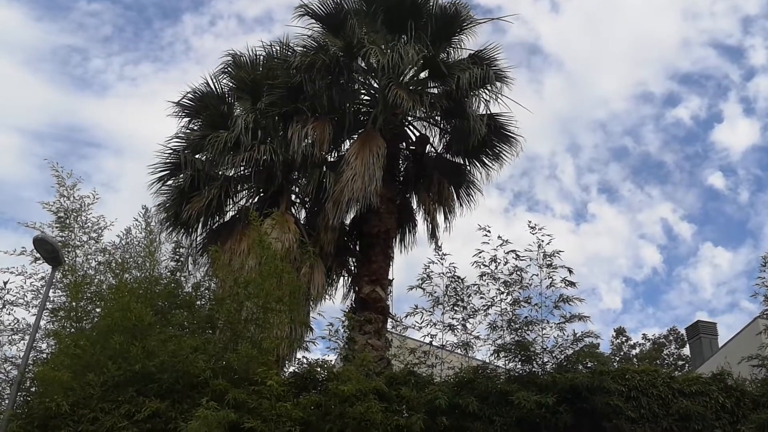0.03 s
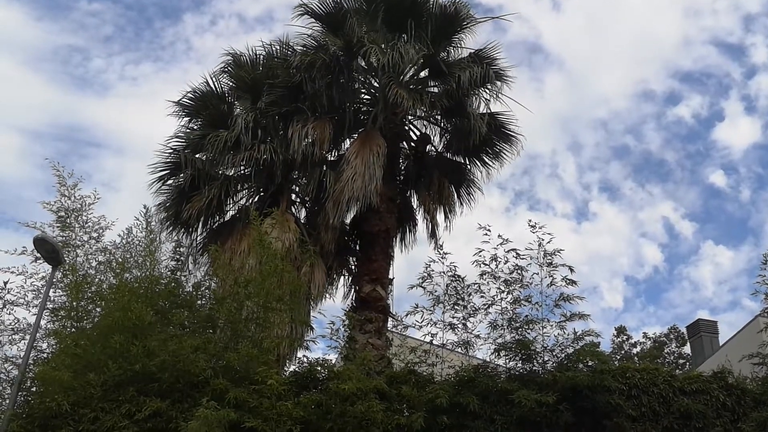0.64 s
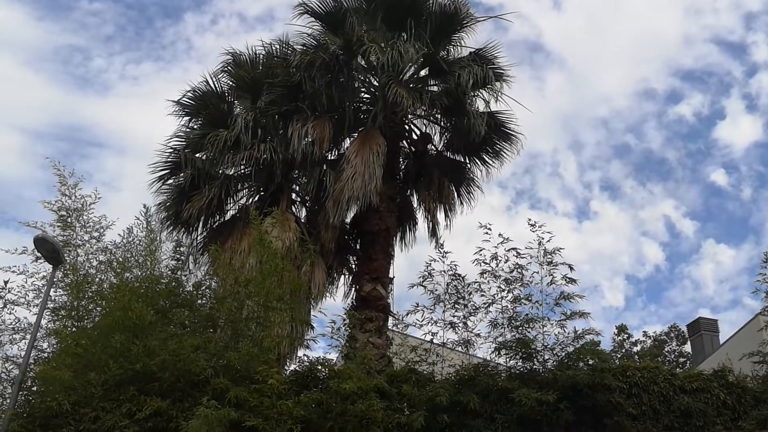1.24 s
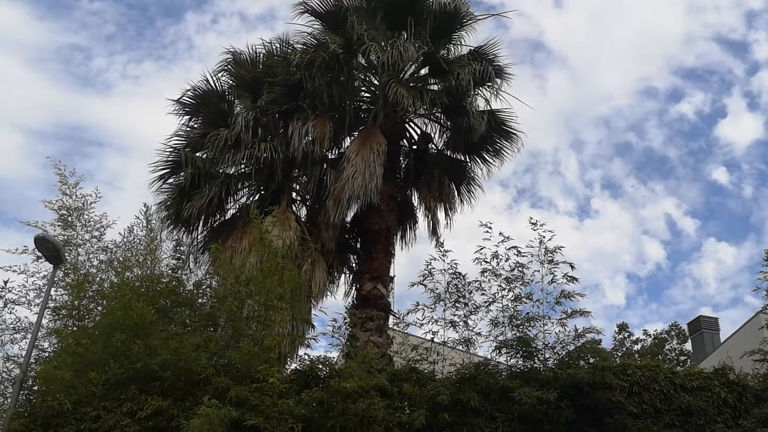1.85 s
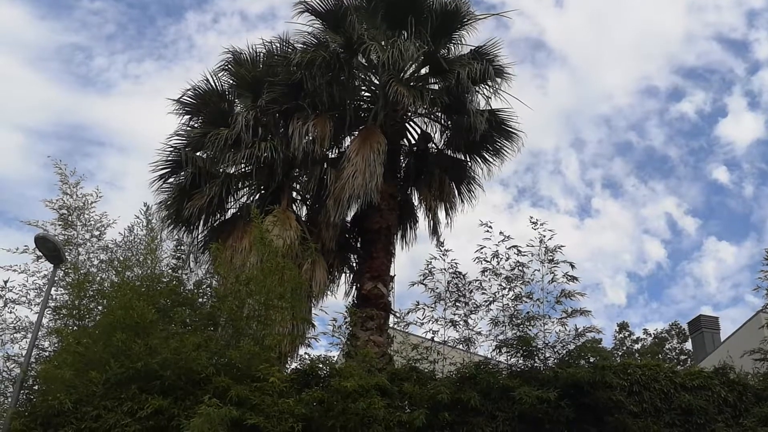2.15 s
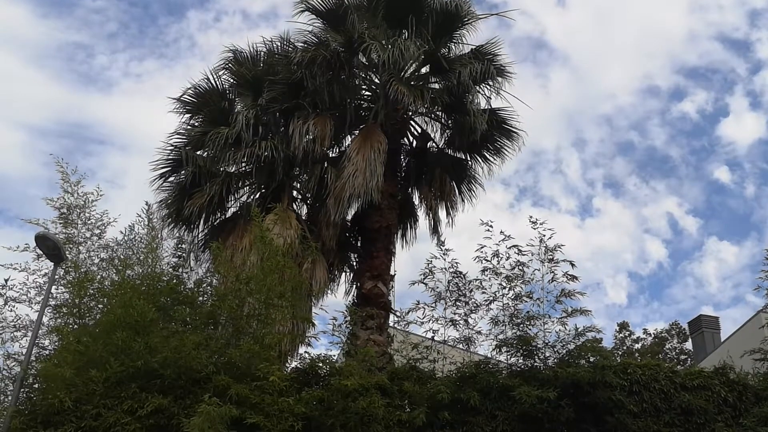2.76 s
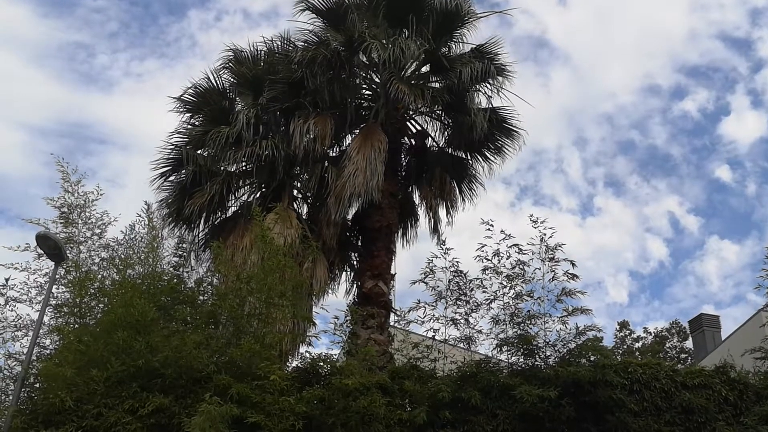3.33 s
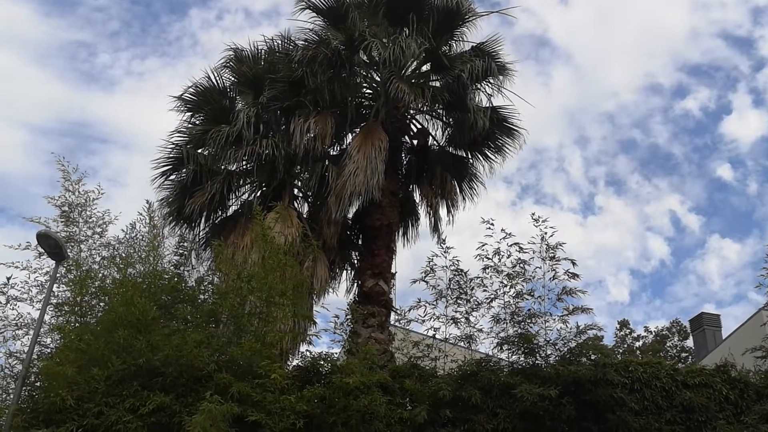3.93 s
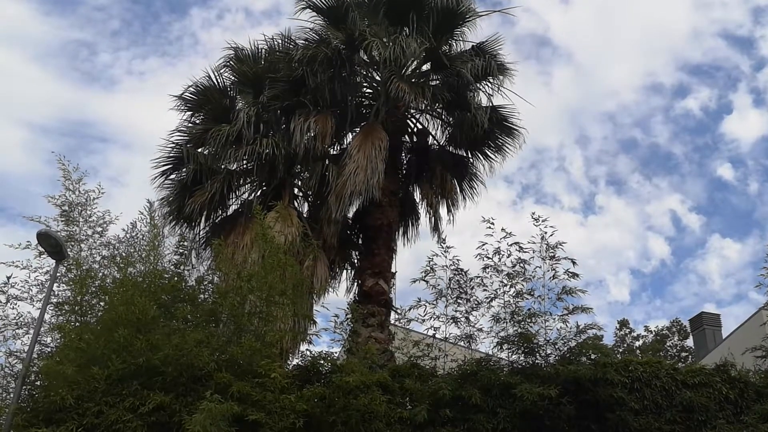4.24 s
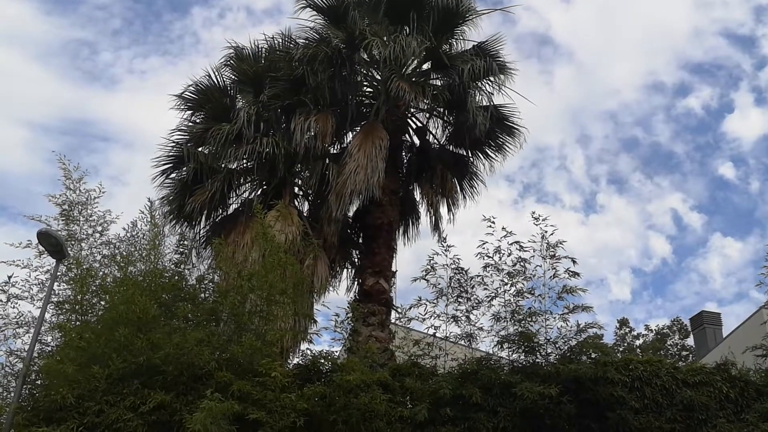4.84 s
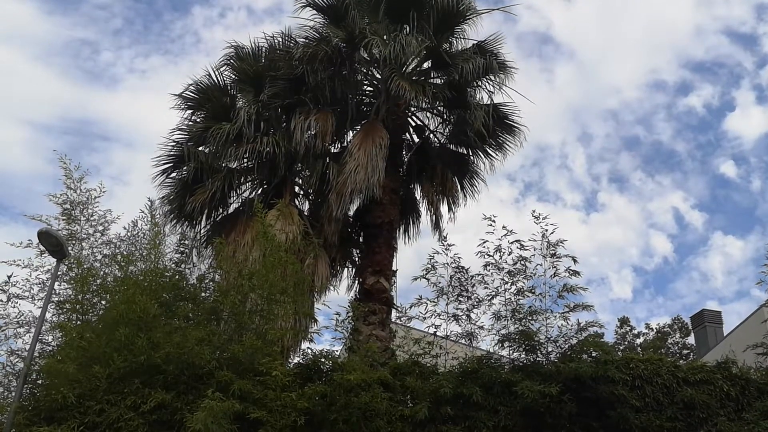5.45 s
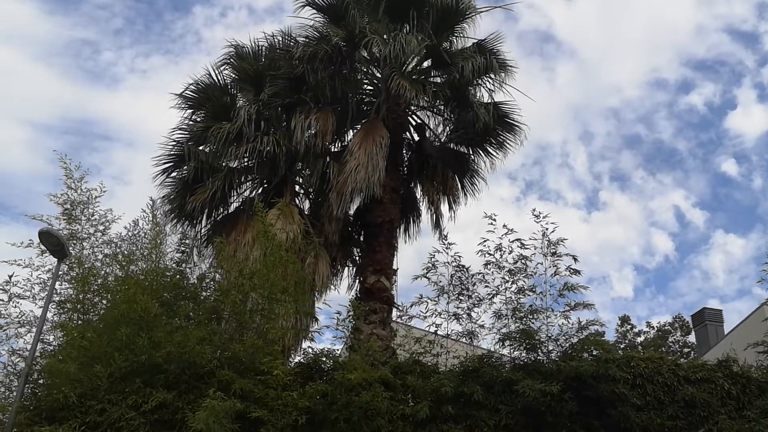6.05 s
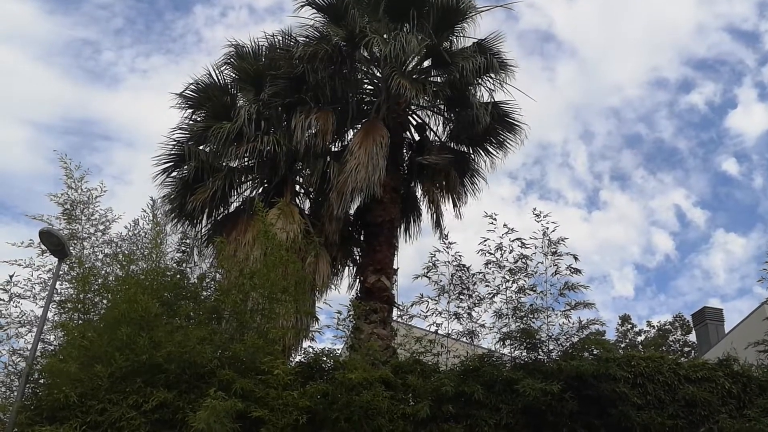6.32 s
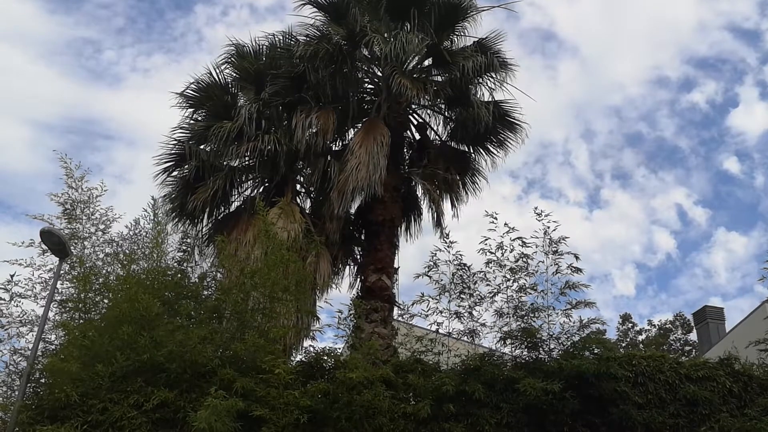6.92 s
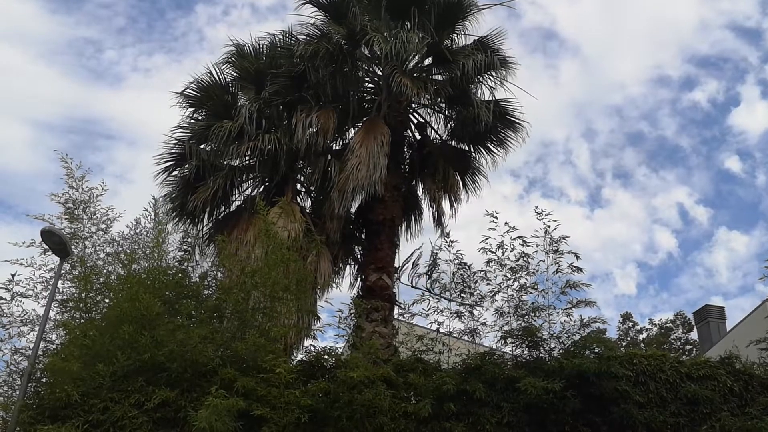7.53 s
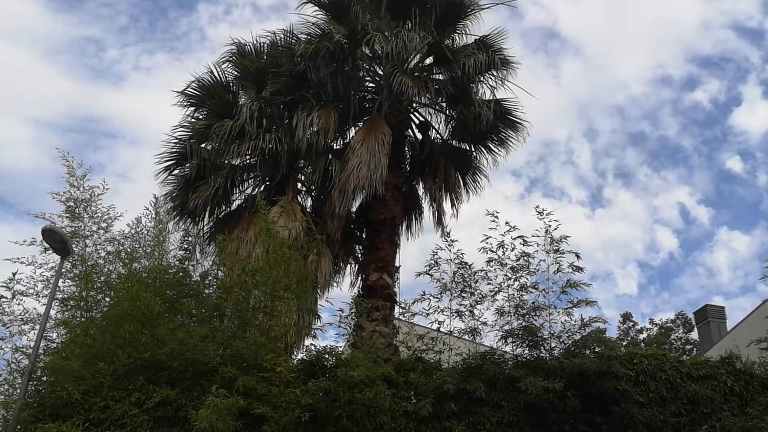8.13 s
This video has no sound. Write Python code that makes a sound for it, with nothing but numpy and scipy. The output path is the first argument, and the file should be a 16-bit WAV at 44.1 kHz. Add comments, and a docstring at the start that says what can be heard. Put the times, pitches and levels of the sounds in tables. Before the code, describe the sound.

Dry palm leaves rub, crackle and snap in repeated tugs, near the microphone and to the right. About halfway through, a bent stalk creaks and cracks, and near the end a loose frond clacks onto the ground and settles. Garden walls give the cracks a short echo. Behind this are a few faint, high bird chips, soft low wind rumble on the microphone and a distant wash of traffic.

```python
"""In a garden, close on the right, dry palm fronds are pulled and dragged: their leaflets rub and snap.
Bent stalks creak, one breaks, and a frond falls and lands with a sharp clack. A small bird chips
now and then. Distant town noise lies underneath, air bumps the microphone, and the garden walls
give a short echo."""
import sys
import numpy as np
from scipy import signal
from scipy.fft import rfft, irfft, next_fast_len
from scipy.io import wavfile
from scipy.ndimage import uniform_filter1d, map_coordinates

SR = 44100
rng = np.random.default_rng(int(sys.argv[2]) if len(sys.argv) > 2 else 0)


def dump(signal):
    """Clip the signal to [-1, 1] and save it as 16-bit WAV at the path in sys.argv[1]."""
    limited = np.clip(np.atleast_2d(signal).T, -1, 1)
    pcm = np.round(limited * 32767).astype(np.int16)
    wavfile.write(sys.argv[1], SR, pcm)


N = 360738

# Levels in tables are relative. A fade_s is the time a sound takes to fall by 60 dB.
# How close sounds lean to the right: pitch_hz, left_minus_right_db
NEAR_BALANCE = [(300, 9), (700, -3.5), (1700, -2), (2700, -12), (4400, -5), (5800, -8), (7800, -7),
                (10500, -16), (15000, -16)]
# How the town and the air lean to the right: pitch_hz, left_minus_right_db
FAR_BALANCE = [(120, 0), (300, -.4), (1100, -.5), (1500, -4), (2900, -7), (4400, -3), (5600, -7),
               (7500, -3), (10000, -8), (15000, -1)]


def amp(db):
    """Turn decibels into a gain to multiply by."""
    return 10 ** (np.asarray(db) / 20)


def unit(x):
    """Scale a sound so that the average of its channels has strength (rms) 1."""
    return x / np.sqrt(np.mean(np.atleast_2d(x).mean(0) ** 2) + 1e-20)


def along(points, hz):
    """Read between (pitch_hz, value) points, with octaves evenly spaced."""
    pitches, values = np.transpose(points)
    return np.interp(np.log(hz + 1), np.log(pitches + 1), values)


def curve(points):
    """Join (time_s, value) points with straight lines, one value per sample."""
    times, values = np.transpose(points)
    return np.interp(np.arange(N) / SR, times, values)


def wobble(rate_hz):
    """A smooth random curve through rate_hz new values a second."""
    return map_coordinates(rng.standard_normal(int(N * rate_hz / SR) + 4), [np.arange(N) * rate_hz / SR])


def swell(start_s, rise_s, hold_s, fade_s):
    """The gain of one stroke or puff: it builds up, holds, then dies away."""
    t = np.arange(N) / SR - start_s
    return np.clip(t / rise_s, 0, 1) ** 1.04 * amp(-60 * np.clip((t - rise_s - hold_s) / fade_s, 0, 2))


def filtered(x, response):
    """Turn each frequency up or down by the gain response(hz)."""
    size = next_fast_len(N + 8192)
    return irfft(rfft(x, size) * response(np.fft.rfftfreq(size, 1 / SR)), size)[..., :N]


def below(hz, edge_hz, order=10):
    """A gain that lets through what is lower than edge_hz."""
    return 1 / (1 + (hz / edge_hz) ** order)


def add(track, start_s, sound):
    """Mix a sound into a track."""
    part = track[..., max(round(start_s * SR), 0):][..., :sound.shape[-1]]
    part += sound[..., :part.shape[-1]]


def noise():
    """Two channels of plain hiss."""
    return rng.standard_normal((2, N))


def narrow(centre_hz, width_hz):
    """A band of hiss so narrow that it sounds like a fluttering note."""
    return unit(filtered(noise(), lambda hz: 1 / (1 + ((hz - centre_hz) / width_hz) ** 4)))


def placed(pair, colour, balance):
    """Make one stereo sound from two noises, with a tone colour and a left-right balance."""
    # How alike the two sides are: pitch_hz, likeness (1 = the same)
    likeness = [(25, .9995), (70, .988), (130, .95), (290, .62), (560, -.25), (1200, .45), (3100, .1),
                (15000, .08)]
    angle = lambda hz: np.arccos(np.clip(along(likeness, hz), -1, 1)) / 2
    mid, side = filtered(pair, lambda hz: amp(along(colour, hz)) * [np.cos(angle(hz)), np.sin(angle(hz))])
    stereo = np.array([mid + side, mid - side])
    return unit(filtered(stereo, lambda hz: amp(np.outer([.5, -.5], along(balance, hz)))))


def nearby(pair, share):
    """Sound bounces weakly off the ground and nearby things, differently on each side."""
    delays_s = rng.uniform(.001, .03, (2, 7))
    return np.array([x + share * sum(np.roll(x, round(delay * SR)) for delay in delays)
                     for x, delays in zip(pair, delays_s)])


def town():
    """A wash of distant traffic with a narrow whir in it."""
    # Tone colours of the traffic and the whir: pitch_hz, level_db
    traffic_colour = [(110, -47), (180, -8), (213, -4), (309, -22.5), (394, -5), (457, -11.5), (639, -10.5),
                      (756, -14), (846, -22), (1060, -15.5), (1650, -13.5), (2270, -13.5), (3760, -22),
                      (7630, -26.5), (15500, -44)]
    whir_colour = [(500, -51), (850, -12.5), (1020, -7.5), (1130, -4.5), (1300, -16.5), (1900, -51)]
    traffic = placed(nearby(noise(), share=.057), traffic_colour, FAR_BALANCE)
    traffic *= amp(-64 + .67 * wobble(1.82))
    whir = placed(nearby(noise(), share=.6), whir_colour, FAR_BALANCE)
    return traffic + amp(-66.5 + wobble(2.91)) * whir


def air(rub_gain):
    """Air hits the microphone: the breeze rumbles, puffs and fanning fronds flutter, one boom sounds."""
    # Tone colours of the moving air: pitch_hz, level_db
    rumble_colour = [(11, -35), (18, 1), (32, 1.5), (48, 3), (152, -13.5), (183, -17), (257, -30),
                     (300, -21), (390, -44), (660, -120)]
    flutter_colour = [(40, -30), (80, 4.5), (120, 2.5), (200, -7), (350, -12.5), (600, -21.5),
                      (1200, -25.5), (3000, -88)]
    # Strength of the breeze and of the low boom: time_s, level_db
    breeze_levels = [(0, -49), (1.05, -47.5), (1.35, -52), (1.6, -42), (1.95, -56), (2.3, -41.5),
                     (2.6, -56.5), (3.3, -45), (4.65, -46.5), (4.95, -52.5), (5.2, -43.5), (5.9, -52),
                     (6.6, -50), (7.2, -57.5), (8.18, -48)]
    boom_levels = [(0, -74), (.1, -41.5), (.22, -39.5), (.28, -33.5), (.44, -34.5), (.52, -44), (.59, -33),
                   (.63, -83), (.8, -100)]
    # Puffs of air: start_s, rise_s, hold_s, fade_s, level_db
    puffs = [(0.0, 0.23, 0.26, 0.39, -52), (1.418, 0.093, 0.15, 1, -36), (2.197, 0.12, 0.035, .4, -46),
             (2.967, 0.047, 0.09, 1.0, -48), (5.157, 0.14, 0.052, 0.74, -61),
             (6.07, 0.077, 0.076, 0.34, -45.5)]
    steady_db, fanning_db, boom_hz = -58, -10, 62.7
    rumble = placed(noise(), rumble_colour, FAR_BALANCE)
    rumble *= np.hypot(amp(curve(breeze_levels) + 1.07 * wobble(8)), amp(-53.5))
    puff_power = sum((amp(db) * swell(*timing)) ** 2 for *timing, db in puffs)
    flutter = placed(noise(), flutter_colour, FAR_BALANCE)
    flutter *= np.sqrt(puff_power + amp(steady_db) ** 2 + (amp(fanning_db) * rub_gain) ** 2)
    boom_gain = amp(curve(boom_levels) + 3 + 1.6 * wobble(22.5))
    boom = boom_gain * np.sin(2 * np.pi * np.cumsum(boom_hz + 2 * wobble(13)) / SR)
    return rumble + flutter + boom


def bumps():
    """Soft bumps on the microphone, each a few slow waves of air pressure."""
    # The bumps: start_s, pitch_hz, level_db, length_s
    pushes = [(1.697, 45, -36, 0.092), (2.244, 67.3, -32.5, 0.095), (3.142, 40.7, -33.5, 0.098),
              (4.533, 33, -37.5, 0.13), (7.902, 48.3, -37.5, 0.065)]
    out = np.zeros(N)
    for start_s, hz, db, length_s in pushes:
        t = np.arange(int(length_s * SR)) / SR
        add(out, start_s, amp(db) * signal.windows.tukey(len(t), .6) * np.sin(2 * np.pi * hz * t))
    return out


def chip(hz, length_s):
    """One bird note that wavers and falls slightly."""
    progress = np.linspace(0, 1, int(length_s * SR))
    waver = .093 * uniform_filter1d(rng.standard_normal(len(progress)), size=36)
    pitch_hz = hz * (1 + .0057 * (.5 - progress) + waver)
    return unit(signal.windows.tukey(len(progress), .3) * np.sin(2 * np.pi * np.cumsum(pitch_hz) / SR))


def bird():
    """Short chips, each scattered by the walls into a fading wash, and a few very high whistles."""
    # Bird calls: start_s, pitch_hz, level_db, length_s, echo_db, echo_fade_s
    calls = [(2.78, 5100, -52, 0.0072, -57.5, 0.96), (3.311, 5080, -44.5, 0.027, -46, 0.55),
             (3.652, 4920, -43.5, 0.012, -44, 0.18), (5.463, 4990, -46.5, 0.015, -52.5, 0.51),
             (5.646, 4980, -53, 0.047, -56, 0.78), (5.928, 5080, -59, 0.017, -58.5, .5),
             (5.961, 5040, -54, 0.011, -58.5, .4)]
    # Thin whistles: start_s, pitch_hz, level_db, hold_s
    whistles = [(5.33, 11200, -64, .08), (5.41, 14350, -66, .06), (5.53, 14350, -71, .04),
                (5.68, 11200, -61, .1), (5.68, 11900, -62, .1)]
    song, echo_gain = np.zeros((2, N))
    t = np.arange(SR // 2) / SR
    for start_s, hz, db, length_s, echo_db, fade_s in calls:
        add(song, start_s, amp(db - 3) * chip(hz, length_s))
        add(echo_gain, start_s, amp(echo_db - 60 * t / fade_s) * (1 - np.exp(-t / .0049)))
    out = song + echo_gain * narrow(4970, width_hz=160) * amp(.99 * wobble(70))
    for start_s, hz, db, hold_s in whistles:
        gain = np.zeros(N)
        add(gain, start_s, amp(db - 60 * np.maximum(t - hold_s, 0) / .26) * (1 - np.exp(-t / .0083)))
        out += gain * narrow(hz, width_hz=170) * amp(1.3 * wobble(50))
    return out * amp([[-3], [2.5]])  # left, right


def wall_echo(x):
    """The garden walls give a blurred echo in which each frequency dies at its own speed."""
    # How long the echo lasts: pitch_hz, fade_s
    fades = [(200, 0.44), (2000, 1), (5000, 0.59), (12000, 0.52)]
    hz, t, bands = signal.stft(rng.standard_normal((2, SR // 2)), SR, nperseg=256)
    tail = signal.istft(bands * amp(-60 * t / along(fades, hz)[:, None]), SR, nperseg=256)[1]
    return signal.fftconvolve(np.atleast_2d(x), tail / np.linalg.norm(tail[0]), axes=1)[:, :N]


def crackle(per_second, spread_db, decay_s):
    """The gain of many tiny contacts: random in time, mostly small, each dying quickly."""
    chance, size_draw = rng.random((2, N))
    size = amp(spread_db * np.minimum(-np.log(size_draw + 1e-9), 4))
    t = np.arange(SR // 20) / SR
    energy = signal.fftconvolve((chance < per_second / SR) * size ** 2, np.exp(-2 * t / decay_s))[:N]
    return unit(np.sqrt(np.abs(energy)))


def creaks():
    """Fibres slip in quick uneven runs that make a bent stalk ring near 3000 Hz."""
    # Moments of bending: start_s, length_s, level_db
    bends = [(3.909, .03, -53), (4.276, 0.02, -39.5), (4.308, 0.033, -39.5), (4.376, 0.023, -36),
             (4.745, 0.016, -51), (6.9, 0.024, -59.5), (7.186, 0.01, -64)]
    # Tone colour of a creak: pitch_hz, level_db
    colour = [(1200, -21), (2200, -4), (2650, 4), (3100, 1), (3600, -4), (4500, -28), (9000, -20),
              (15000, -49)]
    strain = np.zeros(N)
    for start_s, length_s, db in bends:
        add(strain, start_s, amp(db) * signal.windows.tukey(int(length_s * SR), .2))
    slips = noise() * crackle(per_second=1200, spread_db=1.5, decay_s=.0015)
    return strain * placed(slips, colour, NEAR_BALANCE)


def stalk_break():
    """Bundles of fibres give way in a quick crunch, and the freed stalk thuds."""
    # Tearing bundles: start_s, level_db, fade_s
    tears = [(4.12, -30, 0.14), (4.144, -23.5, 0.036), (4.15, -37, 0.047), (4.156, -32.5, 0.026)]
    # Tone colour of the crunch: pitch_hz, level_db
    colour = [(71, -21), (120, -14), (668, -4), (887, -18), (1090, 6), (1380, -11), (1530, 2), (1660, -6),
              (2030, 0), (3800, -9.5), (7700, -7), (11500, -23), (15000, -53)]
    # Where it sits: pitch_hz, left_minus_right_db
    balance = [(300, 0), (1500, -3), (3000, -10), (8000, -7.5), (12000, -23)]
    t = np.arange(SR // 4) / SR
    force, thud = np.zeros((2, N))
    for start_s, db, fade_s in tears:
        add(force, start_s, amp(db - 60 * t / fade_s))
    thud_s, thud_hz = 4.145, 178
    thud_gain = amp(-33.5 - 60 * t / .18) * (1 - np.exp(-t / .0028))
    add(thud, thud_s, thud_gain * np.sin(2 * np.pi * thud_hz * t))
    return thud + force * placed(noise(), colour, balance)


def landing():
    """The end of the stalk clacks down three times in a few milliseconds; the leaves flop after it."""
    # Hits on the ground: start_s, level_db
    hits = [(7.6991, -32), (7.7021, -20.5), (7.7048, -26.5)]
    # Notes the dry stalk rings at (wider ones die sooner): pitch_hz, width_hz, level_db
    notes = [(1170, 21, -29), (1727, 21, -33), (1780, 310, -14), (3020, 270, -10), (3160, 200, 0),
             (3550, 280, -20), (7240, 770, -1.5), (12500, 2500, -24)]
    t, out = np.arange(SR // 4) / SR, np.zeros((2, N))
    bright_band = signal.butter(2, [1500, 9000], "band", fs=SR, output="sos")
    for start_s, db in hits:
        ring = sum(amp(level + rng.normal(0, 1)) * np.exp(-np.pi * width * t) * np.sin(2 * np.pi * hz * t)
                   for hz, width, level in notes)
        ring *= 1 - np.exp(-t / .00022)
        splinters = .2 * amp(-60 * t / .025) * signal.sosfilt(bright_band, rng.standard_normal((2, len(t))))
        add(out, start_s, amp(db) * (ring + splinters) * amp([[-4], [3]]))
    flop_s, flop_hz = 7.8, 300
    flop_gain = amp(-47.5 - 60 * t / .13) * (1 - np.exp(-t / .003))
    add(out, flop_s, flop_gain * np.sin(2 * np.pi * flop_hz * t))
    return out


def papery(pair):
    """Give noise the papery ring of dry leaves, close on the right."""
    # Overall tone colour of the leaves: pitch_hz, level_db
    colour = [(260, -31), (450, -15.5), (661, -18.5), (944, -11), (1330, -10), (1660, -3.5), (2190, -6.5),
              (2660, -4), (4470, -15), (5580, 1), (7500, 2), (8450, -6.5), (12100, -12), (14200, -22),
              (15500, -28)]
    # Small peaks and a dip on top of it: pitch_hz, width_hz, level_db
    peaks = [(3120, 210, 2.5), (4510, 950, 2), (5770, 110, 3), (6250, 600, -3), (7760, 330, 3)]
    ring = lambda hz: amp(sum(db * np.exp(-((hz - centre) / width) ** 2) for centre, width, db in peaks))
    return placed(filtered(pair, ring), colour, NEAR_BALANCE)


def snaps():
    """A leaflet buckles: a sharp tick, with a short shiver of the blade."""
    # Snapping leaflets: start_s, level_db, body_extra_db
    buckles = [(1.029, -33, -17), (1.138, -31, -23), (1.225, -25, -10.5), (1.476, -35, -14),
               (1.7244, -27, -22), (1.783, -24.5, -8), (1.9805, -35, -14), (2.05, -26, -24),
               (2.8406, -31, -15), (2.9805, -38, -3), (3.045, -27, -17), (3.0865, -29, -5.5),
               (4.28, -24.5, -17), (4.3134, -30, -11), (4.3808, -24.5, -10), (4.4748, -18, -11),
               (4.7486, -47.5, 6), (6.1865, -30.5, -4.5), (6.4602, -35, -19), (6.543, -25, -14),
               (6.982, -45.5, -1), (7.1856, -52.5, 4.5)]
    t = np.arange(SR // 6) / SR
    shape = amp(-60 * t / .034) + amp(-11 - 60 * t / .45)  # quick drop, faint tail
    tick, body = np.zeros((2, N))
    for start_s, db, body_extra_db in buckles:
        add(tick, start_s, amp(db - 20.5) * shape)
        add(body, start_s, amp(db + body_extra_db - 8.5) * shape)
    leaves = papery(noise())
    low = filtered(leaves, lambda hz: below(hz, 5400))
    high = filtered(leaves - low, lambda hz: below(hz, 13000, order=5))
    return tick * unit(high) + body * unit(low)


def patchy(x, depth_db):
    """Each leaflet has its own tone colour, so the sound shifts in small patches of pitch and time."""
    bands = signal.stft(x, nperseg=512)[2]
    patches = uniform_filter1d(rng.standard_normal(bands.shape[1:]), size=3, axis=0)
    patches = uniform_filter1d(patches, size=9, axis=1)
    return signal.istft(bands * amp(depth_db * patches / patches.std()), nperseg=512)[1][:, :N]


def pulling():
    """Gains of rub, crackle and fizz: each pull is one stroke, and the leaflets tremble on after it."""
    # Strokes; the last three are the loose frond brushing past, landing and settling:
    # start_s, rise_s, hold_s, fade_s, rub_db, crackle_extra_db, fizz_extra_db
    pulls = [ (0.0, 0.043, 0.017, 0.18, -42.5, 10.5, 0), (.04, 0.04, 0.063, 0.26, -41.5, 4.5, -6),
             (.17, 0.0063, 0.01, .15, -45, 4, 0), (.2, 0.023, 0.07, 0.37, -52.5, -7, -15),
             (.3, 0.11, .2, 0.1, -66.5, -7, -27), (.78, 0.074, .1, 1, -66.5, 1, -10),
             (1.026, .004, 0.053, 1.1, -57.5, 0.5, -7.5), (1.09, 0.056, .16, 0.44, -54.5, -6, -13),
             (1.47, 0.0066, 0.072, 0.47, -45, 1.5, -7), (1.58, 0.026, 0.02, 0.59, -46, -4, -10.5),
             (1.723, 0.0049, .04, .3, -46, 2.5, -5), (1.765, .025, 0.014, .3, -40.5, 0, -7.5),
             (1.945, 0.12, .03, 0.27, -51, -1, 2), (2.06, 0.058, 0.035, 0.7, -44.5, -3.5, -10.5),
             (2.83, .02, 0.17, 1.5, -53, 0, -8), (3.075, 0.013, 0.0083, 0.28, -54.5, 3, -2),
             (3.13, 0.078, 0.15, 1.4, -56.5, -5.5, -12), (3.6, 0.011, 0.62, 0.97, -60, -5.5, -12),
             (3.905, 0.0064, .04, .3, -53, -8, -10), (3.925, 0.087, .045, 0.68, -41.5, -2, -5),
             (4.17, 0.027, 0.024, .45, -41.5, -7, -13), (4.29, 0.032, 0.16, 0.44, -46, -1, -5),
             (4.441, 0.039, 0.018, 0.74, -38, -3.5, -10), (5.02, 0.084, .03, 1.5, -49.5, -3.5, -9.5),
             (5.12, 0.038, .02, 0.83, -42.5, -7.5, -14), (5.2, 0.05, .11, 0.83, -48, -4, -8),
             (5.629, 0.02, 0.096, 1.23, -52.5, -6.5, -10.5), (5.96, 0.028, .015, 0.18, -62.5, 8, -6),
             (6.045, .085, .07, 0.61, -48, -6.5, -10.5), (6.172, 0.011, 0.011, 0.18, -49.5, -4, 3),
             (6.542, 0.0043, 0.053, 0.53, -59.5, 6.5, -1), (6.66, 0.024, 0.041, 0.39, -57, -8, -11),
             (6.92, .04, .16, 0.23, -65.5, -2.5, -4.5), (7.49, 0.021, 0.026, 0.42, -79, 20, -4),
             (7.698, 0.0024, 0.015, 0.67, -47, -5.5, -13.5), (8.0, 0.063, 0.026, 1.2, -64.5, -6, -25)]
    # Leaves stirring lightly between pulls: time_s, rub_db
    stirring = [(0, -57), (.55, -69), (.7, -72.5), (1.3, -61.5), (2.65, -67), (3.5, -68), (4.9, -64.5),
                (6.4, -64), (6.85, -69), (7.25, -79), (8.18, -84)]
    power = np.outer(amp([0, -3, -9.5]), amp(curve(stirring))) ** 2  # rows: rub, crackle, fizz
    for start_s, rise_s, hold_s, fade_s, db, crackle_extra_db, fizz_extra_db in pulls:
        stroke = swell(start_s, rise_s, hold_s, fade_s)
        tremble = amp(-29) * swell(start_s, rise_s, hold_s, fade_s=.85)
        gains = amp([db, db + crackle_extra_db, db + fizz_extra_db])
        power += np.outer(gains ** 2, stroke ** 2 + tremble ** 2)
    return np.sqrt(power)


def rustle(rub_gain, crackle_gain, fizz_gain):
    """Leaflets slide over each other and catch: a lower rub, a crisp crackle and a high fizz."""
    contacts = crackle(per_second=1100, spread_db=2.4, decay_s=.002)
    catches = crackle(per_second=160, spread_db=2.4, decay_s=.0015)
    clumps = np.sqrt(contacts ** 2 + .18 * catches ** 2 + .35) * amp(.6 * wobble(40))
    leaves = papery(nearby(patchy(noise(), depth_db=2) * clumps, share=.17))
    rub = unit(filtered(leaves, lambda hz: below(hz, 4630)))
    crisp = unit(filtered(leaves, lambda hz: (1 - below(hz, 3200)) * below(hz, 8640, order=16)))
    fizz = unit(filtered(leaves, lambda hz: 1 - below(hz, 8270, order=20)))
    return rub * rub_gain * amp(-1) + crisp * crackle_gain * amp(-2.26) + fizz * fizz_gain * amp(-3.5)


def scene():
    """Everything heard in the garden."""
    rub_gain, crackle_gain, fizz_gain = pulling()
    cracks = snaps() + stalk_break() + creaks()
    clack = landing()
    echo = wall_echo(amp(-7.5) * cracks + amp(-12.5) * clack)
    fronds = rustle(rub_gain, crackle_gain, fizz_gain) + cracks + clack
    return fronds + echo + bird() + air(rub_gain) + bumps() + town()


def record(dry):
    """The very highest treble is cut off steeply."""
    return filtered(dry, lambda hz: below(hz, edge_hz=15300, order=120))


dry = scene()
out = record(dry)
dump(out)
```